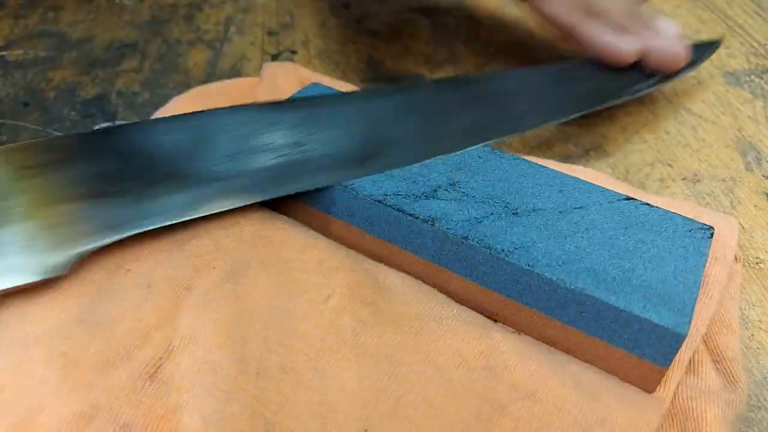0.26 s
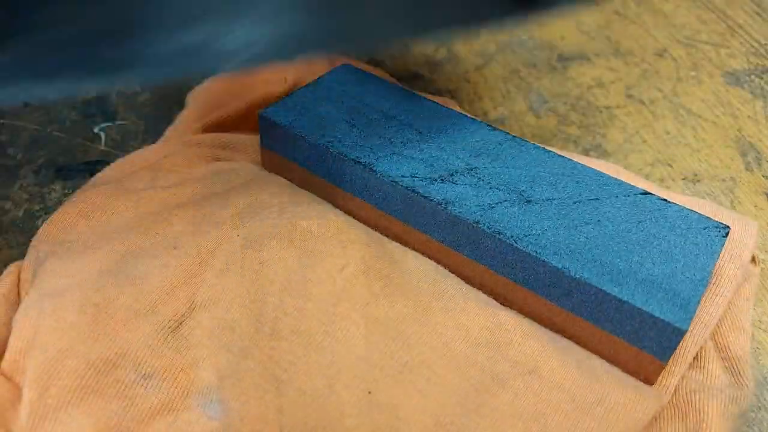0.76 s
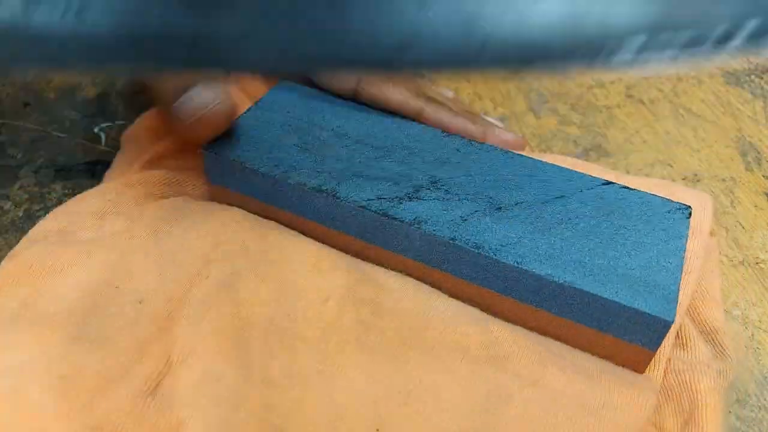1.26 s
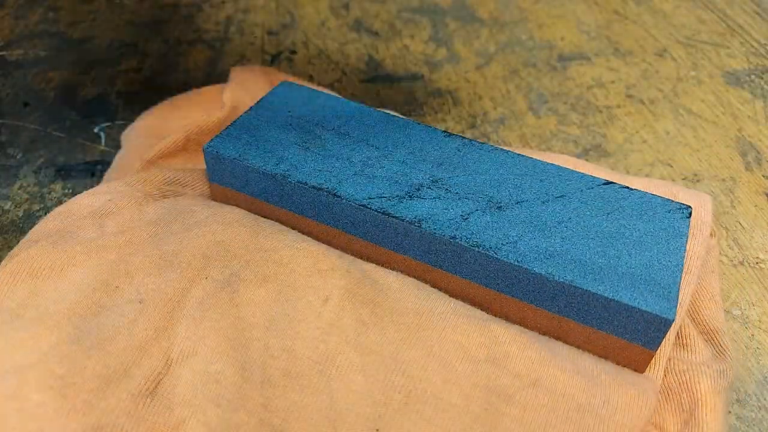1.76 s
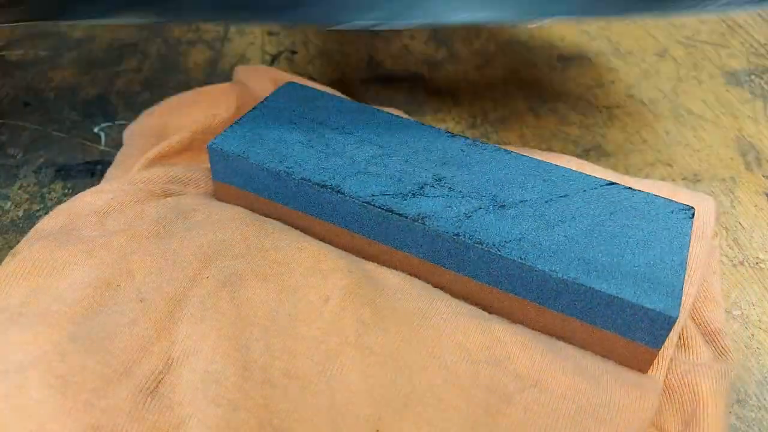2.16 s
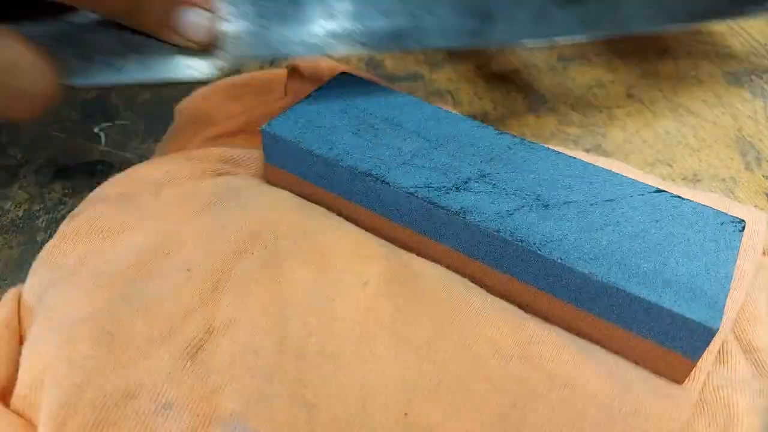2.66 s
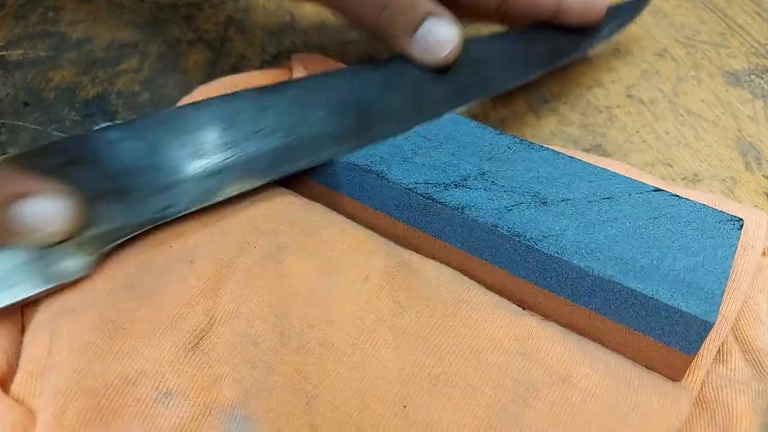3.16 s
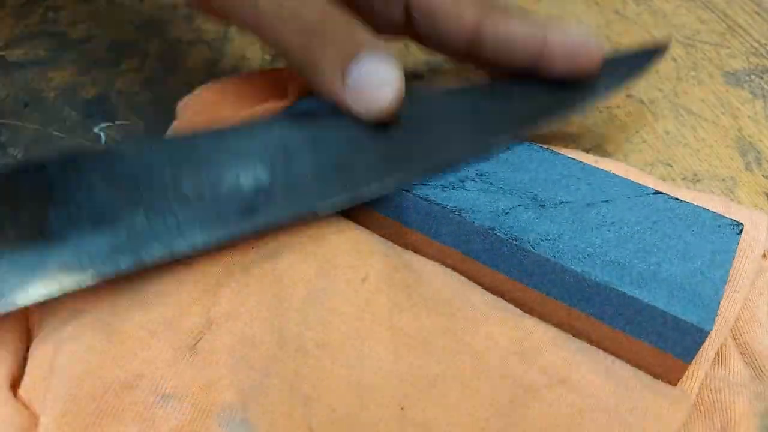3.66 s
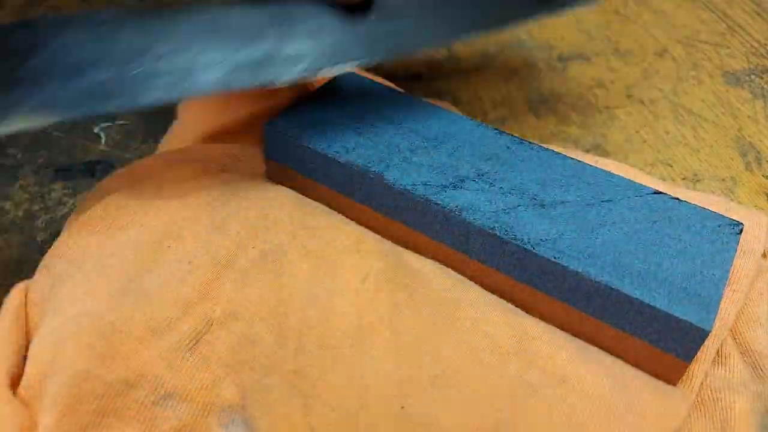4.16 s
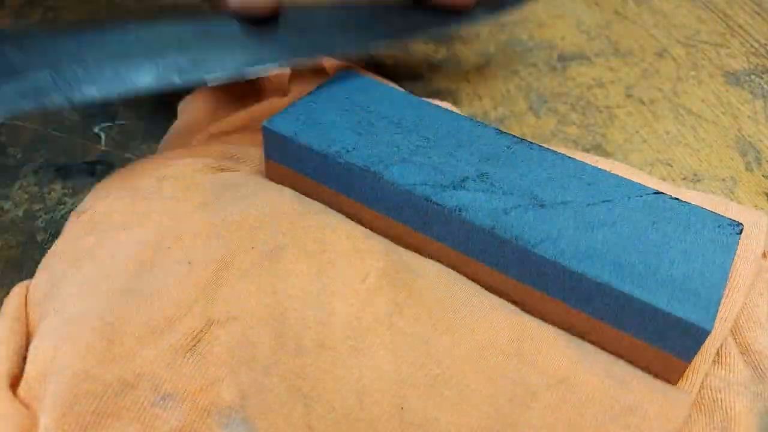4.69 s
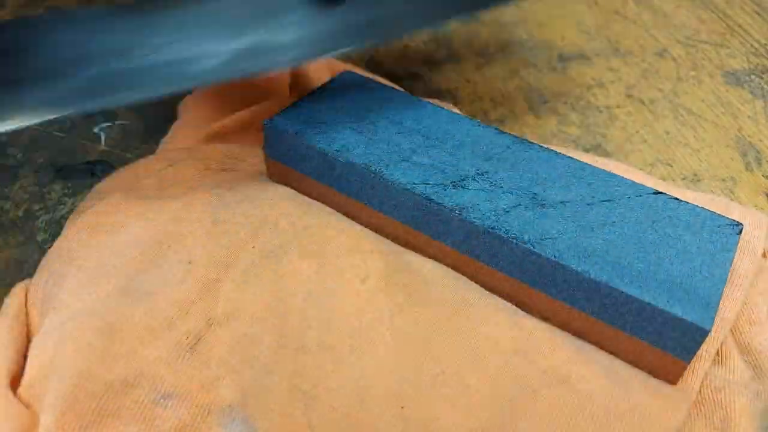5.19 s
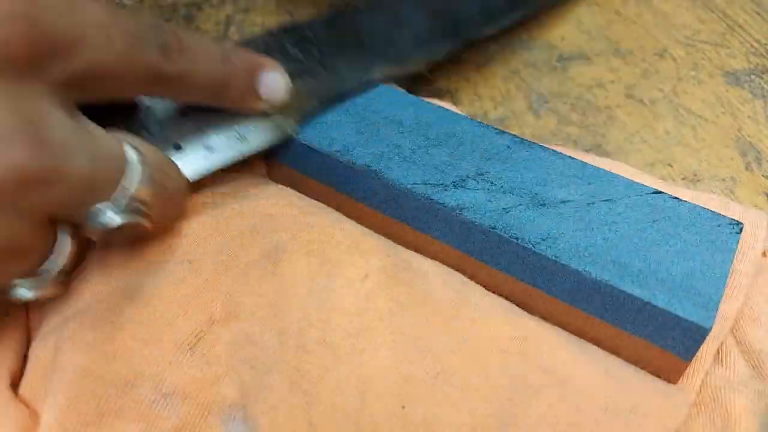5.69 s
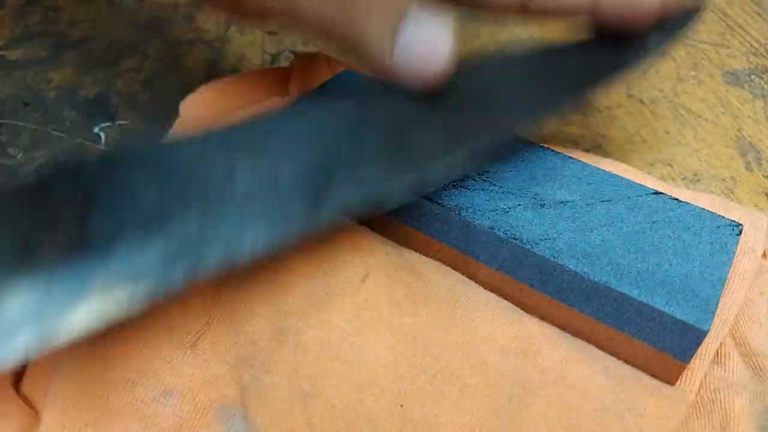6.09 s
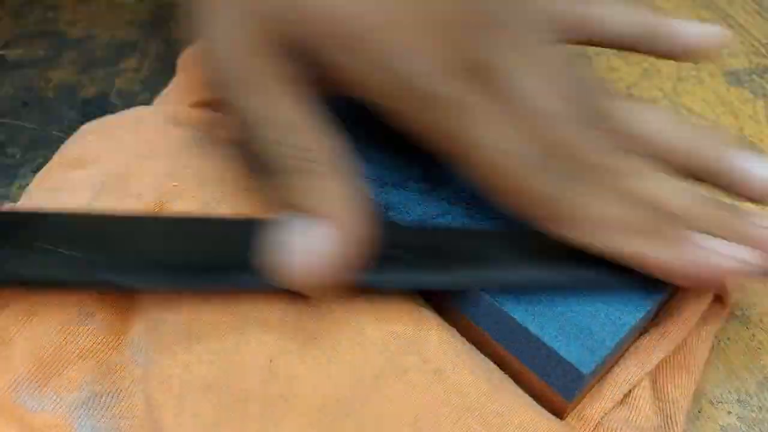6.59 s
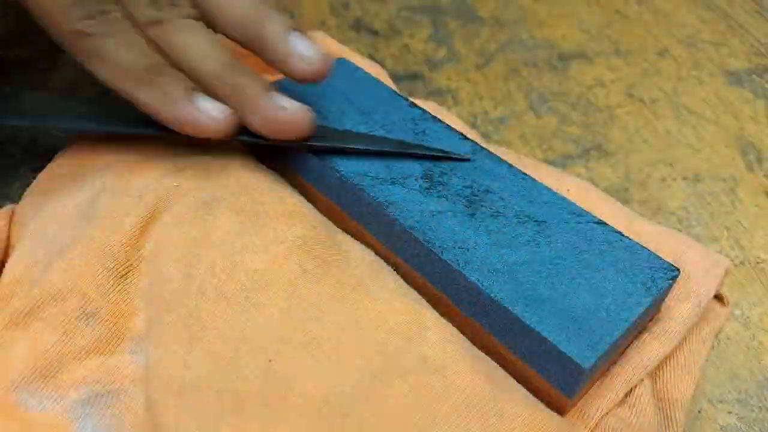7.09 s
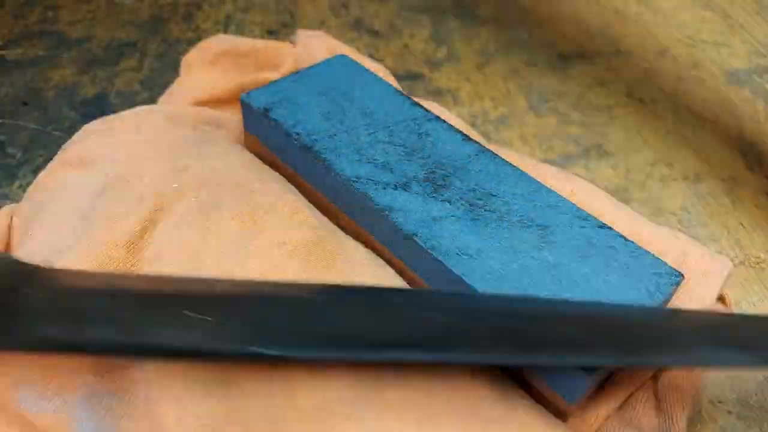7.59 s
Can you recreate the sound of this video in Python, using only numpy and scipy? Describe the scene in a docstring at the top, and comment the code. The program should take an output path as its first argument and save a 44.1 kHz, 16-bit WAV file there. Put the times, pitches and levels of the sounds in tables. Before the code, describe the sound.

A long steel blade is stroked by hand over a whetstone, crisp hissing scrapes about three a second, with ticks and dull wooden bench thumps.

```python
"""Steel blade on a whetstone

A long steel blade is drawn by hand over a whetstone on a cloth on a wooden bench.
Each stroke ticks on landing, hisses as random grit clicks excite the edge, rasps in the stone
and booms in the bench-top resonances. Filtered noise gives a quiet workshop hum, cloth rustle and blade rings.
A pair of microphone ports listens from close by, through a short room tail."""
import sys
import numpy as np
from scipy import signal
from scipy.fft import rfft, irfft, next_fast_len
from scipy.io import wavfile
from scipy.ndimage import uniform_filter1d

SR = 44100
rng = np.random.default_rng(int(sys.argv[2]) if len(sys.argv) > 2 else 0)


def to_wav(s):
    """Save 16-bit WAV."""
    ch = np.atleast_2d(s).T  # columns
    pcm = np.round(np.clip(ch, -1, 1) * 32767)  # PCM
    wavfile.write(sys.argv[1], SR, pcm.astype(np.int16))


N = 346185

# Workshop hum colour: freq_hz, relative_db
HUM_COLOUR = [(30, -37), (90, -21), (130, -5.5), (200, -4.5), (330, -13), (600, -19), (1100, -25.5),
              (2500, -48.5), (5000, -56), (16000, -49)]
# Hum lines: freq_hz, resonator_width_hz, relative_db
HUM_LINES = [(135, 10, -4), (192, 10, 4), (266, 10, 1)]
# Hum swell: time_s, gain_db
HUM_SWELL = [(0, 6), (1.3, 0.5), (1.7, 5), (4.3, -0.5), (7.85, -2.5)]
# Thin tone coming and going in the hum: time_s, level_db
WHINE_LEVEL = [(0, -81), (1.2, -70), (1.55, -59.5), (3, -65), (4.3, -71.5), (7.85, -74)]
# Room decay: freq_hz, t60_s
ROOM_DECAY = [(300, 0.097), (2000, 0.15), (12000, 0.11)]
# Port likeness: freq_hz, left_right_likeness (0-1)
PORT_LIKENESS = [(70, .3), (130, .98), (400, .99), (700, .8), (1300, .7), (2200, .45), (15000, .56)]
# Port balance: freq_hz, left_minus_right_db
PORT_BALANCE = [(60, 1.5), (200, -3), (550, 1.2), (1100, .3), (2200, 3.3), (15000, .7)]
# Blade working across the front of the ports: time_s, left_lead_us
PORT_LEAD = [(0, 22.6), (2.5, 63), (4.5, 86), (6, 94), (6.6, 10), (7.85, 6.6)]
# Hands and sleeve on blade and cloth: time_s, level_db
RUSTLE_LEVEL = [(1.22, -93), (1.31, -72), (1.355, -60.5), (1.41, -76), (1.56, -100), (1.72, -100),
                (1.78, -78), (2.03, -83.5)]
# Rustle colour: freq_hz, relative_db
RUSTLE_COLOUR = [(1500, -16.5), (3000, -8.5), (7000, -11.0), (15700, -11.0), (16000, -61.5)]
# Faint steady rings of the blade: start_s, end_s, pitch_hz, level_db
RINGS = [(0, 0.12, 1030, -50), (0, 0.06, 870, -54), (0, 0.09, 2000, -62), (.15, 0.27, 1220, -62),
         (0.44, 0.6, 740, -63), (0.21, 0.33, 860, -59), (.52, 0.63, 1420, -69), (2.2, 2.4, 778, -56)]
# Rings gliding as the contact slides along the blade: start_s, end_s, from_hz, to_hz, level_db
GLIDES = [(0.068, 0.17, 1900, 900, -60), (0.375, 0.458, 898, 1600, -46), (0.735, 0.786, 1244, 1564, -40.5),
          (0.976, 1.068, 1900, 873, -48.5), (3.564, 3.652, 835, 1295, -40),
          (4.101, 4.206, 934, 1200, -45.5), (4.473, 4.582, 1800, 951, -43.5),
          (4.777, 4.82, 1870, 1276, -43), (4.97, 5.049, 1800, 1025, -46.5),
          (5.204, 5.252, 1800, 1082, -42.5), (5.443, 5.529, 1900, 727, -39), (5.688, 5.772, 1910, 889, -40),
          (5.755, 5.811, 955, 1290, -41), (6.025, 6.089, 1000, 1670, -42), (6.426, 6.496, 948, 1046, -44.5),
          (3.362, 3.407, 1200, 2065, -42.5)]
# Light scuffs: start_s, end_s, from_hz, to_hz, resonator_width_hz, level_db
SCUFFS = [(0.931, 0.959, 730, 976, 830, -43), (7.055, 7.175, 1700, 830, 900, -60),
          (2.275, 2.378, 3400, 2700, 1320, -67.5), (2.594, 2.651, 570, 970, 420, -40),
          (5.541, 5.656, 2500, 1300, 2050, -60), (7.56, 7.623, 2000, 1400, 1300, -54),
          (1.78, 1.92, 10300, 10300, 460, -71.5)]
# Knocks through the bench legs: start_s, peak_db
KNOCKS = [(4.975, -49), (6.345, -41)]
# Edge catching or blade set down, bench booming: start_s, level_db
CATCHES = [(.076, -21), (0.134, -22), (.461, -20.5), (0.674, -20), (1.238, -39.5), (2.454, -14.5),
           (2.736, -42), (3.064, -20.5), (3.313, -18.5), (3.34, -12), (3.366, -19.5), (3.611, -22.5),
           (3.889, -14.5), (4.105, -22.5), (4.159, -23.5), (4.66, -31), (6.08, -15.5), (6.32, -19),
           (6.374, -29), (7.3, -22), (7.593, -34.5)]
# Bench-top modes: freq_hz, width_hz, relative_db
BENCH_MODES = [(229.2, 84.5, -5), (264.8, 34.5, 3), (383.3, 20, -5.5), (477, 73, -13)]
# Broad bench shake under the modes: freq_hz, relative_db
BENCH_SHAKE = [(30, -32.5), (100, -55.5), (165, -37.5), (500, -42.5)]
# Stone modes: freq_hz, width_hz, relative_db
STONE_MODES = [(611, 73, 12.5), (800, 42, 7), (868, 31, 9), (1023, 33, 10.5), (1123, 110, 7.5),
               (1520, 4100, -5)]
# Blade spine modes: freq_hz, width_hz, relative_db
SPINE_MODES = [(1440, 240, -0.5), (1830, 430, 6.5), (2445, 570, -1)]
# Edge biting coarser grit in mid-stroke: time_s, level_db
BITES = [(2.189, -24.5), (2.6743, -20), (3.2715, -22.5), (3.5713, -24), (4.1814, -32), (4.7476, -25),
         (4.9596, -28)]
# Landing chatter colour: freq_hz, relative_db
CHATTER_COLOUR = [(300, -25.5), (4000, -7.0), (11000, -1.5), (17000, -8.0)]
# Scratched edge colour, then its top end: freq_hz, relative_db
SCRATCH_COLOUR = [(1290, -37.5), (2200, -16.5), (6300, -4.5), (6840, -1.5), (9050, -7.5), (14700, -8),
                  (15700, -2)]
SCRATCH_TOP = [(15850, -10.5), (16050, -74.5)]
# Blade rings: freq_hz, width_hz, db_over_scratch
BLADE_MODES = [(6900, 430, -10), (10560, 710, 4), (12580, 510, 8), (14460, 760, 6)]
# Strokes: landing_s, run_up_s, contact_s, slow_start_db, scratch_db, boom_db, rasp_db, tick_db, thump_db,
# edge_brightness_db_per_octave, stone_tone_db_per_octave
STROKES = [ (0.016, 0.093, .15, 21, -31, -35, -42, -37, -30.5, 0.2, 3),
           (0.3098, 0.08, .15, 10.5, -32, -32.5, -41, -32.5, -21.5, -0.5, -0.5),
           (.631, 0.071, .16, 24.5, -28.5, -35, -39.5, -24.5, -25, 0.6, -0.5),
           (0.9443, 0.085, 0.14, 15, -34, -31.5, -40, -28.5, -26.5, -0.5, -4),
           (2.0384, 0.12, 0.17, 26.5, -27, -31, -38.5, -31, -28, -1, -0.5),
           (2.38, 0.088, .11, 1.5, -29, -32, -39.5, -22, -21, 0.5, -0.5),
           (2.64, 0.038, 0.11, 9, -30, -31, -40, -20.5, -27, -1.5, 1),
           (2.9493, 0.028, 0.15, 3.5, -28, -33.5, -41.5, -20, -29, -0.5, 4),
           (3.2407, 0.041, 0.15, 8.5, -30.5, -31, -39, -20, -30, -1, 2.5),
           (3.5437, 0.032, 0.12, 6.5, -29.5, -33, -41, -44, -36, -1, 5.5),
           (3.8053, 0.086, 0.12, 12.5, -29, -33.5, -36, -24.5, -49.5, -3.7, -0.5),
           (4.0725, 0.012, 0.14, 8, -32.5, -40.5, -41.5, -23, -53, -1.5, 2.5),
           (4.4208, 0.073, 0.13, 29, -28.5, -32.5, -41.5, -31.5, -33, 1.5, 4.5),
           (4.708, 0.05, 0.098, 26, -29.5, -38, -45, -34, -31.5, -0.5, -1),
           (4.9233, 0.057, 0.11, 23.5, -29.5, -37, -46.5, -32, -38, 0.8, 4),
           (5.1652, 0.037, 0.088, 12, -32, -39, -46.5, -32.5, -22, 0, 4),
           (5.398, 0.049, 0.13, 16.5, -32, -38.5, -46.5, -36, -25.5, 1, 2),
           (5.666, 0.037, 0.15, 13.5, -33, -35.5, -40, -24, -23, -2, 0),
           (5.962, 0.034, 0.14, 5.5, -35.5, -36, -41, -24, -41, -1.2, 2),
           (6.2589, 0.033, 0.2, 4.5, -31, -40, -45.5, -21, -24.5, 5.5, 6),
           (6.5976, 0.083, 0.15, 26, -35.5, -33, -43.5, -42.5, -24.5, 2.9, 4),
           (6.8956, 0.068, 0.14, 25, -34, -31.5, -43, -39, -23.5, 0.5, 2),
           (7.1791, 0.053, 0.13, 34, -35.5, -36, -46, -38, -28, -2.6, -2.5),
           (7.578, 0.076, 0.15, 25.5, -35, -36.5, -41, -68, -56, -3, -8.5)]
# Light return drags: start_s, length_s, scratch_db, boom_db, rasp_db, stone_tone_db_per_octave
DRAGS = [(1.097, 0.089, -58.5, -45.5, -48.5, -2.5), (2.214, 0.092, -75, -47.5, -47, -10.5),
         (4.574, 0.13, -56.5, -40, -45.5, -9), (4.817, 0.063, -77, -48.5, -74, -4),
         (5.549, 0.127, -59, -38.5, -37.5, -2.5), (7.061, 0.22, -81, -41, -43, -12.5)]
# Per layer (scratch, boom, rasp): share of slow_start_db felt
SLOW_SHARE = [0.87, 0.5, 0.85]
# Per layer: level change from landing to lift (dB)
BUILD_DB = [-3.5, -1, 2.5]
# Per layer: fade along a return drag (dB/s)
DRAG_FADE_DB_PER_S = [248, 40, 104.5]
# Per layer: fade as the edge leaves the stone (dB/s)
LIFT_DB_PER_S = [895, 504, 598]

HUM_DB = -61
WHINE_HZ, WHINE_RESONATOR_WIDTH_HZ = 400, 8
RING_RESONATOR_WIDTH_HZ, GLIDE_RESONATOR_WIDTH_HZ = 40, 220
THUMP_SPREAD = 0.07  # largest share of detuning
UPPER_THUMP_DB = -14  # second bench mode, before its random offset
# Contact runs toward the thin tip: spine level at the lift, rise, power of the travel
SPINE_LIFT_DB, SPINE_RISE_DB, SPINE_CURVE = -14.5, 2.5, 4.2
STONE_RISE_DB_PER_OCTAVE, EDGE_DULLING_DB_PER_OCTAVE = 5.9, 1  # tilt change over a stroke
BAND_EDGE_HZ = 16950
FRAME = 256  # samples


def amp(db):
    """Amplitude ratio of a dB value."""
    return 10 ** (np.asarray(db) / 20)


def evened(x):
    """Scales to unit RMS."""
    return x / np.sqrt(np.mean(x ** 2) + 1e-20)


def read(points, hz):
    """Curve value, interpolated over log frequency."""
    freq_hz, value = np.transpose(points)
    return np.interp(np.log(hz + 1), np.log(freq_hz + 1), value)


def envelope(rows):
    """Gain over time from a dB curve, silent outside it."""
    time_s, db = np.transpose(rows)
    return amp(np.interp(np.arange(N) / SR, time_s, db, left=-200, right=-200))


def held(rows):
    """Each (time_s, value) row holds until the next."""
    time_s, value = np.transpose(rows)
    return value[np.maximum(np.searchsorted(time_s, np.arange(N) / SR) - 1, 0)]


def strikes(events):
    """One impulse at each (time_s, level_db) event."""
    train = np.zeros(N)
    for time_s, db in events:
        train[round(time_s * SR)] = amp(db)
    return train


def modes(table, hz):
    """Complex response of a set of resonances with alternating sign."""
    total = 0
    for k, (f, w, db) in enumerate(table):
        total = total + (-1) ** k * amp(db) * 1j * w * hz / (f * f - hz * hz + 1j * w * hz)
    return total


def below(hz, edge_hz):
    """Causal two-pole fall above an edge: cloth and wood swallow the treble."""
    return 1 / (1 + 1j * hz / edge_hz) ** 2


def filtered(x, response):
    """Applies a frequency response by FFT."""
    size = next_fast_len(N + SR // 2)
    return irfft(rfft(x, size) * response(np.fft.rfftfreq(size, 1 / SR)), size)[..., :N]


def grit(per_s, spread_db):
    """Random clicks of uneven size, two independent streams."""
    size = amp(spread_db * np.minimum(rng.exponential(1, (2, N)), 5))
    signed = size * rng.standard_normal((2, N))
    return evened(signed * (rng.random((2, N)) < per_s / SR))


def patchy(x, patch_db, flicker_db, frames, bins, tilt_db=0, pivot_hz=10000):
    """The moving contact point favours other rings from moment to moment, the high ones most."""
    overlap = FRAME * 3 // 4
    hz, t, z = signal.stft(x, SR, nperseg=FRAME, noverlap=overlap)
    field = rng.standard_normal(z.shape[1:])
    field = uniform_filter1d(field, max(int(bins), 1), 0)
    patches = evened(uniform_filter1d(field, max(int(frames), 1), 1))
    flicker = evened(uniform_filter1d(rng.standard_normal(z.shape[2]), size=4))
    octaves = np.log2((hz[:, None] + pivot_hz / 10) / pivot_hz)
    tilt = np.interp(t, np.arange(N) / SR, tilt_db * np.ones(N)) * octaves
    depth = np.clip(hz[:, None] / pivot_hz, 0.5, 1)
    z = z * amp(patch_db * patches * depth + flicker_db * flicker + tilt)
    return evened(signal.istft(z, nperseg=FRAME, noverlap=overlap)[1][:, :N])


def travel():
    """How far along its stroke the blade is, 0 at the landing and 1 at the lift."""
    strokes = np.array(STROKES)
    since_s = np.arange(N) / SR - held(strokes[:, [0, 0]])
    return np.clip(since_s / held(strokes[:, [0, 2]]), 0, 1)


def contact(layer):
    """Layer gain: sudden at the landing, rising as the blade gathers speed, fading after the lift."""
    age_s, db = np.arange(SR // 2) / SR, np.full(N + SR, -200.)
    for land_s, run_up_s, length_s, slow_db, *levels in np.array(STROKES)[:, :7]:
        slow = SLOW_SHARE[layer] * slow_db * np.maximum(1 - age_s / run_up_s, 0)
        build = BUILD_DB[layer] * (np.minimum(age_s / length_s, 1) - 1 / 2)
        lift = LIFT_DB_PER_S[layer] * np.maximum(age_s - length_s, 0)
        part = db[round(land_s * SR):][:len(age_s)]
        part[:] = np.maximum(part, levels[layer] - slow + build - lift)
    for start_s, length_s, *levels in np.array(DRAGS)[:, :5]:
        lift = LIFT_DB_PER_S[layer] * np.maximum(age_s - length_s, 0)
        fade = DRAG_FADE_DB_PER_S[layer] * age_s + lift
        part = db[round(start_s * SR):][:len(age_s)]
        part[:] = np.maximum(part, levels[layer] - fade)
    return amp(db[:N])


def workshop():
    """Workshop hum: a low noise wash with a few wavering lines from narrow resonances."""
    def colour(hz):
        power = amp(read(HUM_COLOUR, hz)) ** 2
        for f, w, db in HUM_LINES:
            power = power + amp(db) ** 2 * abs(modes([(f, w, 0)], hz)) ** 4
        return np.sqrt(power)

    wash = evened(filtered(rng.standard_normal((2, N)), colour))
    return amp(HUM_DB) * wash * envelope(HUM_SWELL)


def whine():
    """A thin wavering machine tone: noise through a narrow squared resonance."""
    def response(hz):
        return modes([(WHINE_HZ, WHINE_RESONATOR_WIDTH_HZ, 0)], hz) ** 2

    return evened(filtered(rng.standard_normal((2, N)), response)) * envelope(WHINE_LEVEL)


def room(x):
    """A short dense noise tail whose decay time depends on frequency."""
    hz, t, z = signal.stft(rng.standard_normal((2, SR // 2)), SR, nperseg=FRAME)
    decay = amp(-60 * t / read(ROOM_DECAY, hz)[:, None])
    tail = signal.istft(z * decay, SR, nperseg=FRAME)[1]
    tail = np.pad(tail / np.linalg.norm(tail[0]), ((0, 0), (150, 0)))  # delay in samples
    return signal.oaconvolve(x, tail, axes=1)[:, :N]


def rustle():
    """Soft brushing of skin and cloth: dense random clicks, coloured and patchy."""
    brushing = filtered(grit(20000, 1.0), lambda hz: amp(read(RUSTLE_COLOUR, hz)))
    return patchy(brushing, patch_db=2, flicker_db=3, frames=30, bins=3) * envelope(RUSTLE_LEVEL)


def tones():
    """Rings, glides and scuffs: noise through a resonance that may glide, swelling and fading."""
    rows = [(a, b, hz, hz, RING_RESONATOR_WIDTH_HZ, db) for a, b, hz, db in RINGS]
    rows += [(a, b, low, high, GLIDE_RESONATOR_WIDTH_HZ, db) for a, b, low, high, db in GLIDES]
    out = np.zeros((2, N))
    for start_s, end_s, from_hz, to_hz, width_hz, db in rows + SCUFFS:
        a, b = round(max(start_s, 0) * SR), round(end_s * SR)
        carrier = np.exp(2j * np.pi * np.cumsum(np.geomspace(from_hz, to_hz, b - a)) / SR)
        pole = np.exp(-np.pi * width_hz / SR)
        noise = rng.standard_normal((2, 2, SR // 4))[..., :b - a]
        slow = signal.lfilter([1], [1, -2 * pole, pole ** 2], noise)
        ring = evened((carrier * (slow[0] + 1j * slow[1])).real)
        out[:, a:b] += amp(db) * np.sqrt(np.hanning(b - a)) * ring
    return out


def thumps():
    """Two main bench modes, randomly detuned, swell at each landing and catch; dull knocks are added."""
    t, out = np.arange(4000) / SR, np.zeros(N + 4000)
    swell = (t / 0.017 * np.exp(1 - t / 0.012)) ** 2
    events = [(row[0], row[8]) for row in STROKES] + CATCHES
    draws = rng.uniform(-0.89, 1, (len(events), 3))
    for (time_s, db), (low, high, share) in zip(events, draws):
        main = np.sin(2 * np.pi * BENCH_MODES[1][0] * (1 + THUMP_SPREAD * low) * t)
        upper = np.sin(2 * np.pi * BENCH_MODES[2][0] * (1 + THUMP_SPREAD * high) * t)
        pair = main + amp(UPPER_THUMP_DB + 6.0 * share) * upper
        out[round(time_s * SR):][:len(t)] += amp(db) * swell * pair
    push = np.hanning(700) * np.cos(2 * np.pi * 45 * (t[:700] - t[350]))  # 45 Hz
    return out[:N] + signal.oaconvolve(strikes(KNOCKS), push)[:N]


def bench():
    """Uneven jolts from the coarse stone ring the bench top; thumps are added."""
    def body(hz):
        return (modes(BENCH_MODES, hz) + amp(read(BENCH_SHAKE, hz))) * below(hz, 1000)

    jolts = grit(1500, 2.0)
    level = np.sqrt(np.mean(filtered(jolts, body) ** 2))
    return filtered(jolts * contact(1), body) / level + thumps()


def rasp():
    """The drag rings the stone; the spine joins as far as the edge scratches too."""
    drag, along = contact(2), travel()
    tone = held(sorted([(row[0], row[-1]) for row in STROKES + DRAGS]))
    tone = tone + STONE_RISE_DB_PER_OCTAVE * (along - 1 / 2)
    stone = filtered(grit(9000, 0.32), lambda hz: modes(STONE_MODES, hz) * below(hz, 3300))
    spine = filtered(grit(9000, 0.52), lambda hz: modes(SPINE_MODES, hz) * below(hz, 1900))
    stone = patchy(stone, patch_db=3.5, flicker_db=2.5, frames=30, bins=2.5, tilt_db=tone, pivot_hz=920)
    spine_db = SPINE_LIFT_DB - SPINE_RISE_DB * (1 - along ** SPINE_CURVE)
    return drag * stone + amp(spine_db) * np.sqrt(drag * contact(0)) * evened(spine)


def landings():
    """A few milliseconds of bright chatter as the edge touches down or bites."""
    t = np.arange(600) / SR
    hits = strikes(np.array(STROKES)[:, [0, 7]]) + strikes(BITES)
    chatter = signal.oaconvolve(hits, np.exp(-(t / 0.0047) ** 2))[:N]
    noise = evened(filtered(grit(15000, 0.76), lambda hz: amp(read(CHATTER_COLOUR, hz))))
    return chatter * patchy(noise, patch_db=7.0, flicker_db=0, frames=16, bins=5)


def steel(hz):
    """Colour of the scratched edge: a broad rise to the treble with the blade's rings on top."""
    rings = sum(abs(modes([mode], hz)) ** 2 for mode in BLADE_MODES)
    return amp(read(SCRATCH_COLOUR + SCRATCH_TOP, hz)) * np.sqrt(1 + rings)


def scratch():
    """Dense grit under the edge plus sparser crisp grains; blade angle sets each stroke's brightness."""
    brightness = held(np.array(STROKES)[:, [0, 9]]) - EDGE_DULLING_DB_PER_OCTAVE * (travel() - 1 / 2)
    dense = filtered(grit(20000, 0.52), steel)
    dense = patchy(dense, patch_db=6.0, flicker_db=2.5, frames=15, bins=3.8, tilt_db=brightness)
    grains = evened(filtered(grit(1500, 2.6), steel))
    return (dense + amp(-11.5) * grains) * contact(0)


def ports(pair):
    """Mixes two streams into left and right with the likeness, balance and delay of the ports."""
    hz, t, (left, apart) = signal.stft(pair, SR, nperseg=512)
    hz = hz[:, None]
    like = np.clip(read(PORT_LIKENESS, hz), 0, 1)
    side = amp(read(PORT_BALANCE, hz) / 2)
    lead_s = np.interp(t, *np.transpose(PORT_LEAD)) / 10 ** 6
    late = np.exp(-2j * np.pi * hz * lead_s)
    right = like * late * left + np.sqrt(1 - like ** 2) * apart
    return signal.istft(np.array([left * side, right / side]), SR, nperseg=512)[1][:, :N]


def scene():
    """Sums the work, its room tail and the workshop at the ports."""
    work = scratch() + landings() + bench() + rasp() + rustle() + tones()
    return ports(work + amp(-12.5) * room(work) + workshop() + whine())


def record(dry):
    """Low-pass band limit."""
    lowpass = signal.firwin(511, BAND_EDGE_HZ, window=("kaiser", 9), fs=SR)
    return signal.oaconvolve(dry, lowpass[None], "same")


dry = scene()
out = record(dry)
to_wav(out)
```